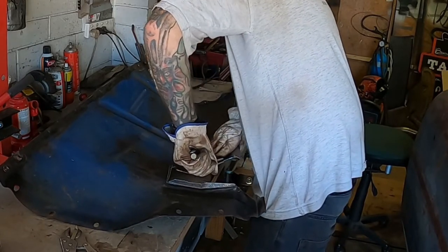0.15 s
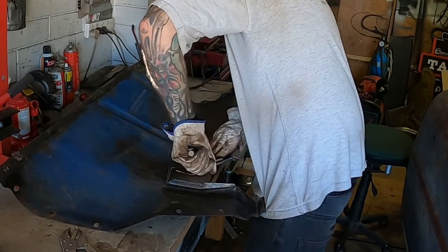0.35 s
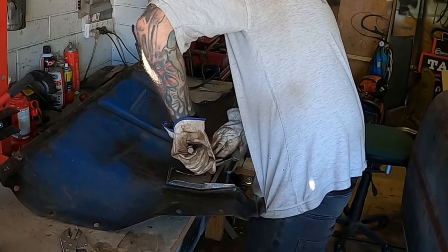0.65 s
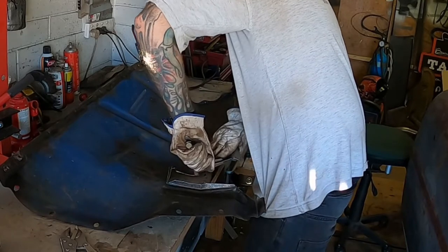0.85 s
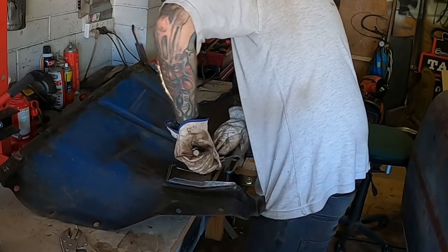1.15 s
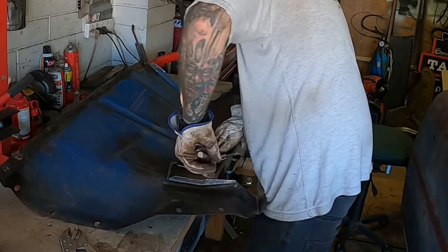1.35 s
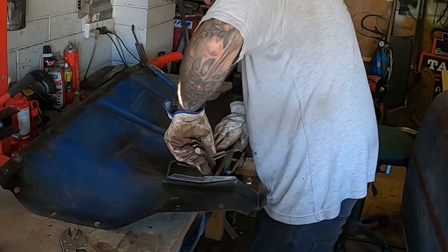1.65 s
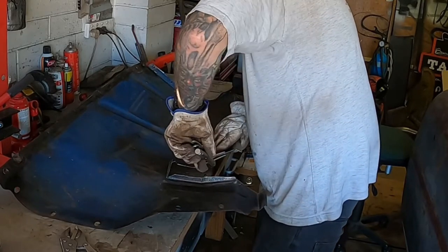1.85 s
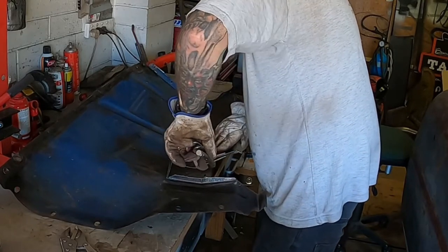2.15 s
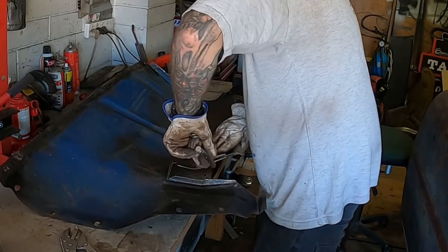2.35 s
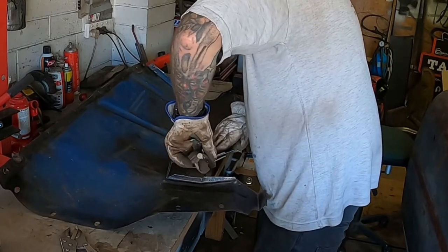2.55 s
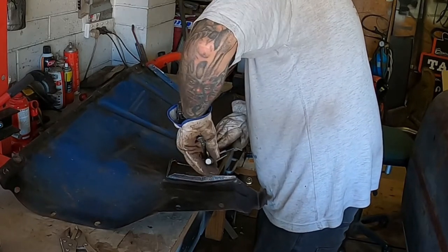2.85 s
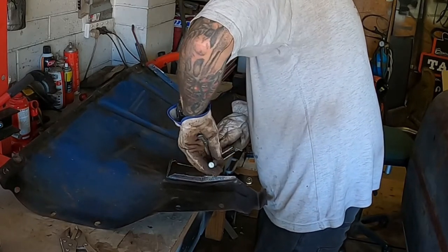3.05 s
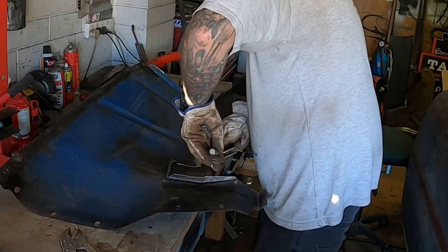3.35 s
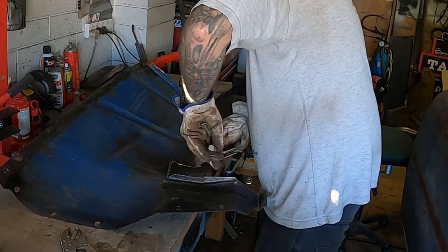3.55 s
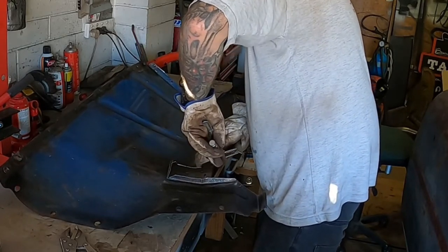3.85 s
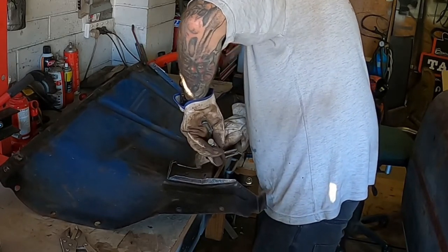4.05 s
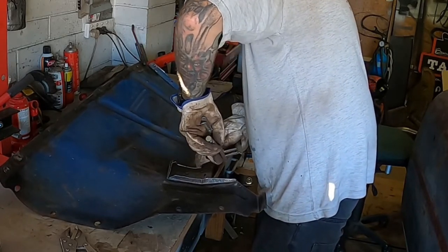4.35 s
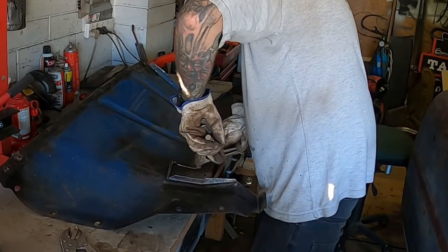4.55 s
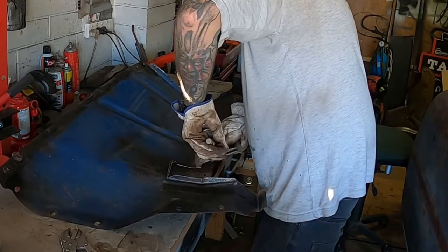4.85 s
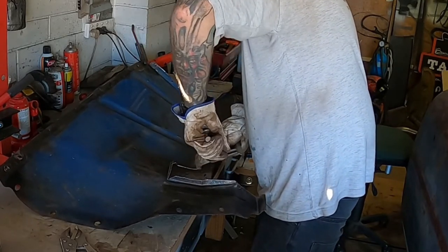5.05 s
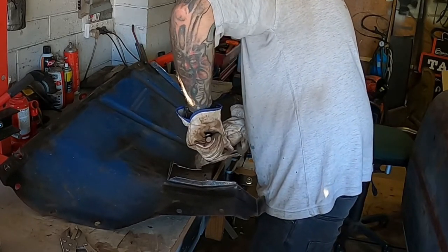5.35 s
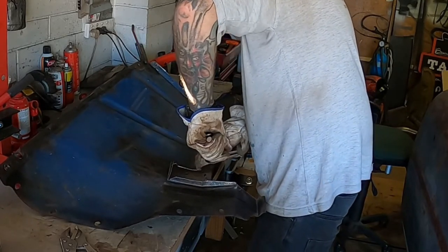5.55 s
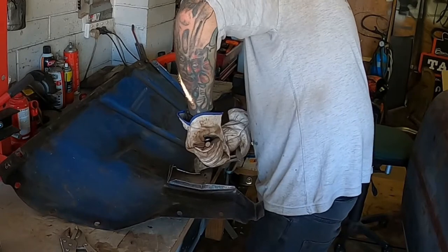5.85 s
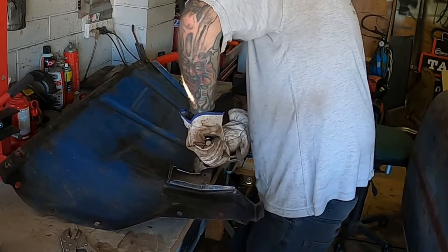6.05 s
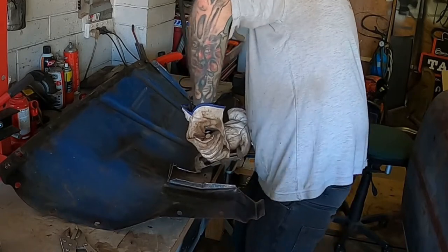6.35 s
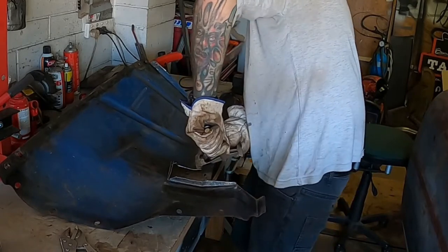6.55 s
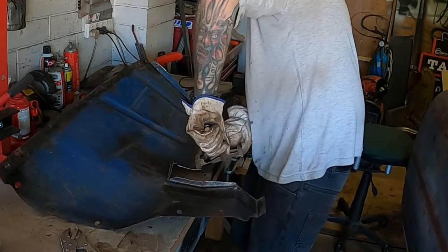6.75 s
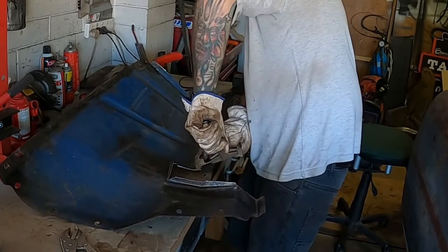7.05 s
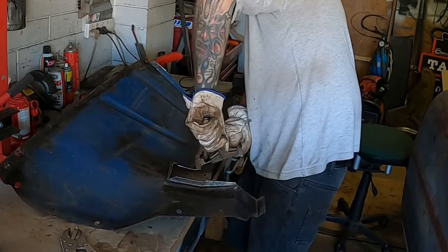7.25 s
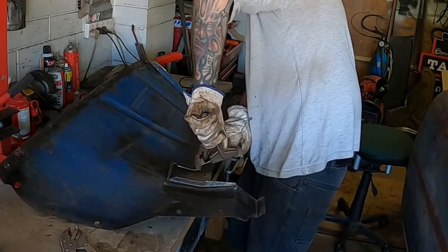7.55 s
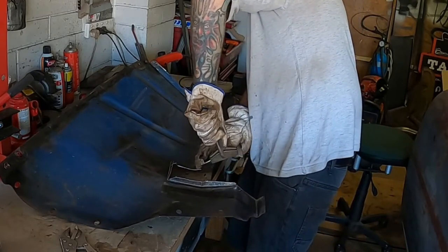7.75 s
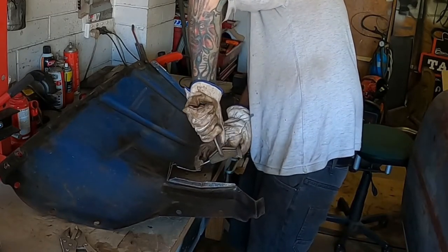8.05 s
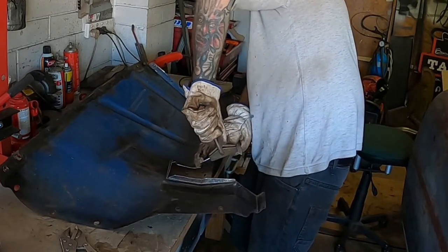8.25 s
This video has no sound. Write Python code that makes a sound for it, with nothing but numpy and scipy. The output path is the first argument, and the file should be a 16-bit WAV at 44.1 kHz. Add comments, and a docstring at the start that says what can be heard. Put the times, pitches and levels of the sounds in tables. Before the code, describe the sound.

A low, wavering machine hum and soft garage murmur run throughout, with a light scrape at the start. From 0.3 s a tool clicks and knocks on sheet metal, tapping unevenly, then building to denser clanks at 1.3-1.65 s. At about 2.1 s comes the loudest ringing clank, with a short rising metallic creak. Knocks, rattles and gritty slides crowd 2.4-3.45 s, turning more hollow. It then thins to faint dull taps until a bright, springy jaw snap at 4.5 s. Sparse knocks lead to a sharp, loud clank at 5.84 s, more clanks to 6.4 s, and softer thuds fading by 7 s. Sparrows chirp faintly outside, around 1, 1.9, 3.5, 5.6, 6.2 and 7.8 s. A tiny thin tone sounds twice near 8 s, before small final taps. Close stereo perspective, with an echoing room.

```python
"""A low, wavering hum and a soft murmur come first, with a light scrape; then a tool knocks sheet metal.
A gloved hand works the tool's jaws on the edge of a panel lying on a garage bench: each blow taps a set of
ringing panel modes, slides and bends feed them noisy slips, and one jaw snap is decaying bands of noise.
Sparrows chirp outside as gliding near-sine notes with echoes, and a faint thin tone sounds twice.
A small two-port microphone hears it all, each port with its own colour and phase."""
import sys
import numpy as np
from scipy import signal
from scipy.fft import rfft, irfft, next_fast_len
from scipy.io import wavfile
from scipy.ndimage import uniform_filter1d

SR = 44100
rng = np.random.default_rng(int(sys.argv[2]) if len(sys.argv) > 2 else 0)


def unload_wav(signal):
    """Save mono or channel-first audio to the path in sys.argv[1] as 16-bit WAV at rate SR, clipped to [-1, 1]."""
    wavfile.write(
        sys.argv[1],
        SR,
        np.round(np.clip(np.atleast_2d(signal).T, -1, 1) * 32767).astype(np.int16),
    )


N = 370432  # length in samples

# Background murmur, its relative strength by pitch: pitch_hz, level_db
AIR_COLOUR = [(36, -17), (62, -1.5), (76, -8), (198, -18), (330, -22), (389, -23.5), (417, -26.5),
              (514, -31), (799, -43.5), (1680, -35), (3370, -36.5), (3700, -36), (11300, -59.5),
              (16000, -118)]
AIR_DB = -43  # overall level

# Low machine tone, its level before the waver: time_s, level_db
HUM_LEVEL = [(0.0, -39), (0.06, -38), (0.28, -31), (0.68, -41.5), (0.72, -42), (0.91, -31), (2.08, -35.5),
             (2.13, -38.5), (2.29, -35), (2.66, -35), (2.76, -40), (4.49, -33), (4.82, -36), (4.89, -53),
             (4.96, -38), (5.19, -38), (5.26, -34), (6.57, -34), (6.76, -40.5), (7.44, -32), (8.35, -39),
             (8.4, -47)]
HUM_HZ, HUM_WAVER_DB = 48.2, 1
# Wavering noise bands around the hum: pitch_hz, width_hz, level_db
DRONE_BANDS = [(28.3, 25, -50), (104.5, 43, -50), (126, 13, -76)]
# A noise band that comes and goes: time_s, level_db
MOAN_LEVEL = [(0.0, -60), (1.61, -49), (1.85, -69), (2.41, -52), (5.38, -52), (5.78, -50.5), (7.13, -51.5),
              (7.51, -47), (8.4, -54)]
MOAN_HZ, MOAN_WIDTH_HZ = 187, 18

# Sparrow notes that arch up and drop; level is at the start of the dry note:
# start_s, length_s, top_hz, before_drop_hz, end_hz, level_db
ARCHED_NOTES = [(1.035, 0.06, 5150, 5050, 3200, -47), (1.852, 0.078, 4850, 4200, 3220, -44),
                (3.475, 0.08, 5050, 4700, 4200, -46), (5.625, 0.075, 5200, 4900, 4000, -50),
                (6.18, 0.065, 4900, 4950, 4700, -51), (7.78, 0.065, 4750, 4700, 3500, -56)]
ARCH_START = .64  # starting pitch as a share of the top
ARCH_UP, ARCH_DOWN = .17, .75  # shares of the length where the top begins and ends
ARCH_SWELL_DB = 8  # gain reached by the end of the note
# The other half of the syrinx sings along a little lower
SECOND_VOICE, SECOND_VOICE_DB = .9, -7  # share of the pitch, relative level
# Near-sine bird notes and faint, nearly steady partials that glide one way;
# level is at the start of the dry note: start_s, length_s, start_hz, end_hz, level_db
GLIDING_TONES = [(1.105, .03, 4600, 3000, -52), (1.935, 0.1, 3200, 4350, -42), (3.54, .06, 5500, 5400, -56),
                 (3.563, 0.105, 3400, 4700, -44), (4.973, 0.021, 5200, 3000, -50),
                 (5.62, .05, 5850, 5600, -55), (5.7, .03, 4200, 2900, -51), (6.228, 0.072, 3550, 4200, -43),
                 (7.32, .06, 6600, 5400, -63), (7.38, 0.024, 5300, 2900, -50),
                 (7.476, 0.03, 3150, 3750, -56), (7.775, .05, 6250, 6100, -64),
                 (7.79, .05, 3150, 3100, -57)]
GLIDE_SWELL_DB = 0.5  # gain reached by the end of the note
FLUTTER = .018  # spread of the pitch flutter, as a share of the pitch
# A faint thin tone, twice: start_s, length_s
THIN_TONES = [(7.945, .065), (8.035, .05)]
THIN_TONE_HZ, THIN_TONE_DB = 1570, -59
BIRD_DIRECT_DB, BIRD_ROOM_DB = -4, -9
YARD_DB, YARD_T60_S = -4, .18  # walls outside; t60 is the time to fall by 60 dB

# Garage echo, time to fall by 60 dB: pitch_hz, fall_s
ROOM_FALL = [(200, 0.82), (1500, 0.46), (5000, 0.85), (12000, 0.22)]
ROOM_DB, ROOM_RISE_S = -17.5, 0.026
ROOM_LIKENESS, ROOM_ALIKE_HZ = 0.29, 700  # power share common to both ports; own parts thin out below this
NEAR_DB, NEAR_FROM_HZ, NEAR_MOVES_HZ = -3.5, 1500, 6  # close echoes: level, treble from, rate of change
NEAR_FADE_S = 0.016  # time to fall to about a third

# The panel's strong modes; each one's own ring time is averaged, as a loss, with that of the tap:
# pitch_hz, level_db, own_ring_s
PANEL_MODES = [(175, -6, .5), (340, -6, .4), (478, -8, .4), (693, -10, .5), (786, -8, .2), (890, -8, .5),
               (948, 0, .45), (1090, -1, .5), (1234, -8, .4), (1328, -7, .45), (1596, -6, .35),
               (1752, -5, .5), (1852, -6, .5), (2063, -5, .6), (2205, -6, .55), (2350, -6, .45),
               (2530, -7, .35), (2770, -6, .3), (3180, -7, .4), (3339, -8, .4), (3561, -7, .5),
               (3740, -10, .4), (4300, -10, .3), (4780, -10, .35), (5044, -10, .3), (5900, -12, .25),
               (6675, -16, .3)]
# The sheet's countless small modes: pitch_hz, share_of_ring_time
SHEET_RING_SHARE = [(200, 1.55), (700, 0.59), (2000, 0.87), (5000, 0.22), (12000, 0.063)]
MODE_SCATTER_DB, MODE_DETUNE = 2, 0.0023  # random spread of each mode's level and, as a share, its pitch
FAVOUR_DB, FAVOUR_OCTAVES, FREE_RING = 7.5, 0.19, 0.11  # boost, low part's width, extra ring-time share
RING_LEN, LEAD = 16384, 256  # samples; the lead leaves room for the filters to swing in

# The jaws spring shut in free air: start_s, level_db
JAW_SNAP_TIMES = [(4.5144, -22.5)]
# The tool's steel jaws: pitch_hz, relative_level_db, fall_by_60_db_s
JAW_RING_MODES = [(3170, -4.5, 0.36), (4660, 1, 0.14), (6670, -11.5, 0.097), (9020, -8, 0.12),
                  (12100, -22, .04)]
JAW_SPREAD, JAW_RISE_S = 0.063, 0.0023  # cluster half-width as a share of pitch; time to build up

# The panel creaks as it bends, and its ring moves in pitch: start_s, length_s, level_db, from_hz, to_hz
PANEL_BENDS = [(2.148, 0.14, -28, 934, 1090), (6.82, 0.27, -52.5, 930, 880)]
BEND_OCTAVES, BEND_T60_S, BEND_MODES_DB, BEND_FADE_DB = 0.19, 0.079, -5, -9

# Slides of jaw and glove; level is the dull part, brightness is relative to it:
# start_s, held_s, level_db, brightness_db
SLIDE_EVENTS = [(0.0, 0.16, -53, -2), (0.7, 0.071, -44, -5), (1.2, 0.27, -45, -1), (1.6, 0.13, -40.5, -23),
                (1.819, 0.17, -62.5, -24), (2.2, 0.05, -53, -1), (2.48, 0.25, -39, -3),
                (2.86, 0.019, -43, 1), (3.18, 0.073, -33.5, -4), (3.55, 0.39, -61, -7),
                (4.7, 0.37, -61.5, -3), (5.12, 0.2, -62, 6.5), (5.449, 0.39, -65, -9),
                (5.9, 0.071, -35, -8.5), (6.15, 0.27, -67, 17), (6.6, 0.18, -61, -4), (6.82, 0.11, -51, -9),
                (8.28, .2, -65, 3.5)]
SLIDE_RISE_DB_S, SLIDE_FALL_DB_S = 232.5, 141
RUSTLE_DB, RUSTLE_BRIGHT_DB = -67, -0.5  # steady scrape under the slides; its brightness

# Blows. The clank (1.5-4 kHz) is a peak level; thud (under 500 Hz), body (0.5-1.5 kHz), click (4-8 kHz)
# and tick (over 8 kHz) are short-term rms levels relative to it. First contact is relative to the rattle:
# start_s, clank_db, thud_db, body_db, click_db, tick_db, thud_hz, low_favoured_hz, high_favoured_hz,
# rattle_s, first_contact_size
BLOW_EVENTS = [(0.308, -29, -19, -20, -2.5, -12.5, 116, 1680, 4630, 0.048, 1.5),
               (0.5014, -47.5, -7, -13, -12, -12, 135, 1050, 2390, 0.023, 1.2),
               (0.6357, -41.5, -11, -11.5, -12, -14, 116, 573, 3190, 0.088, 0.3),
               (0.6678, -26, -20, -23, -23, -13, 116, 1060, 5040, 0.048, 1.37),
               (0.8102, -50, 5, 4.5, -4.5, -27, 117, 540, 1880, 0.022, 0.89),
               (0.951, -39, -14, -10, -19, -25, 116, 1260, 5750, 0.057, 0.81),
               (1.13, -35, 9.5, -20, -21, -18.5, 111.4, 585, 3750, 0.018, 0.74),
               (1.1947, -26.5, -6.5, -40, -35, -42, 159, 1440, 2000, 0.036, 2.4),
               (1.3109, -31.5, -5.5, -34, -13, -19, 290, 1070, 2150, 0.058, 0.22),
               (1.3691, -23, -22, -15, -9.5, -13, 159, 790, 2200, 0.028, 0.61),
               (1.5165, -18, -37, -36, -20.5, -28, 120, 1190, 3680, 0.0097, 0.53),
               (1.521, -17, -24, -13.5, -35, -32, 119, 1250, 1590, 0.059, 0.65),
               (1.581, -13, -25, -14.5, -18, -18.5, 519, 980, 2390, 0.023, 0.74),
               (1.618, -21.5, -27, -11, -25, -29, 515, 1010, 2450, 0.015, 1.2),
               (1.6398, -25, -7.5, -4.5, -9.5, -14.5, 164, 970, 2380, 0.026, 0.46),
               (2.107, -24, -14, -12, -23, -29, 151, 730, 3800, 0.034, 0.045),
               (2.1388, -5.5, -32, -18.5, -20, -25.5, 258, 940, 3400, 0.011, 0.37),
               (2.176, -17.5, -16, -1.5, -31, -31, 258, 970, 3500, 0.025, 0.84),
               (2.204, -33, -25, -10, -28, -34, 258, 1040, 1790, 0.018, 0.72),
               (2.243, -33, -27, -8, -37, -44, 258, 1020, 1850, 0.02, 0.6),
               (2.272, -36, -24, -4, -33, -35, 258, 1080, 1800, 0.0074, 1.2),
               (2.4503, -20, -17.5, -24, -16, -29, 170, 1110, 5100, 0.0077, 0.97),
               (2.5084, -14.5, -17.5, -13, -27, -43, 251, 656, 2430, 0.014, 1.8),
               (2.53, -19, -8.5, -14, -39, -38, 243, 670, 2300, 0.013, 0.55),
               (2.562, -25, -4.5, -28, -6, -14.5, 168, 665, 3760, 0.0097, 0.54),
               (2.6503, -33.5, -7, -14, -16, -10, 116, 690, 2260, 0.036, 1.7),
               (2.6825, -15.5, -26, -59, -17.5, -21, 130, 1110, 3250, 0.0079, 1.8),
               (2.825, -17.5, -37, -14.5, -11.5, -13.5, 520, 1010, 2480, 0.027, 0.72),
               (3.0393, -28, -11, -7.5, -19, -26, 323, 547, 4920, 0.07, 0.37),
               (3.0674, -26.5, -14, -6.5, -18.5, -37, 285, 1430, 2600, 0.1, 0.37),
               (3.1222, -17, -19, -12, -9.5, -37, 474, 980, 2540, 0.03, 1.6),
               (3.1356, -13, -12, -5, -20.5, -35, 373, 1060, 1900, 0.034, 1.04),
               (3.2594, -23.5, -7, -2, -40, -39, 410, 1010, 1580, 0.071, 0.96),
               (3.3371, -27, -11.5, -5, -24, -27, 326, 950, 1500, 0.088, 0.76),
               (3.391, -30.5, -4, -3, -40, -41, 192, 1190, 1530, 0.047, 0.25),
               (3.425, -31.5, -16, 0, -26, -39, 176, 1030, 1530, 0.034, 0.86),
               (3.8409, -43.5, 6.5, -0.5, -32, -30, 176, 1200, 1730, 0.037, 0.19),
               (3.8647, -40, -14, -16, -13, -18, 137, 1060, 2880, 0.043, 0.46),
               (4.26, -57.5, -3, 4.5, -7, -20, 135, 1160, 1570, 0.029, 0.74),
               (4.4739, -45.5, 3, 9.5, -17, -28, 178, 1200, 1730, 0.15, 0.29),
               (4.5155, -22, -5.5, -11, -29, -30, 473, 890, 4400, 0.028, 0.26),
               (4.9267, -45.5, -5, -4, -11, -27, 144, 1180, 1810, 0.033, 0.04),
               (5.2954, -32, -11.5, -11.5, -54, -57, 170, 1280, 2140, 0.043, 0.72),
               (5.4785, -55.5, -3, 0.5, -2, -13, 137, 552, 2350, 0.016, 1),
               (5.7328, -18, -5.5, -9.5, -27, -28.5, 296, 660, 1960, 0.053, 0.65),
               (5.839, -8.5, -28, -30.5, -16, -26.5, 430, 940, 2760, 0.028, 1),
               (6.1166, -22, -37, -14, -25, -30, 406, 1100, 2100, 0.052, 0.48),
               (6.3285, -31.5, -2.5, 0, -44, -44, 300, 1090, 1580, 0.022, 0.73),
               (6.3511, -20.5, -24, -14.5, -44, -37, 304, 1120, 2980, 0.019, 0.12),
               (6.3783, -16, 0, -20.5, -55, -51, 294, 830, 1790, 0.013, 2.7),
               (6.526, -38.5, -20, -24, -20, -24, 262, 1380, 2140, 0.033, 0.78),
               (6.5782, -56, -5, -21, -16, -5, 141.8, 1050, 1560, 0.02, 0.92),
               (6.6431, -52, 0, 4.5, -7, -28, 207, 1210, 1560, 0.014, 0.96),
               (6.6965, -43.5, -5, -1, -9.5, -42, 186, 1098, 2060, 0.022, 1.4),
               (6.7413, -43, -2, 1.5, -11, -40, 192.2, 1200, 1770, 0.0093, 1.4),
               (6.778, -29, 0, -0.5, -35, -33, 525, 890, 1560, 0.0046, 1.9),
               (6.802, -39, 2, -2, -16, -27, 342, 1140, 1540, 0.092, 0.69),
               (6.9796, -55.5, -2, 4.5, -13, -14, 116, 847, 1550, 0.034, 0.84),
               (8.2835, -43.5, -2, -20, -10, -32, 184, 1050, 2830, 0.038, 0.57),
               (8.344, -50, -5, -9, -2, -13, 121, 1070, 2620, 0.075, 0.22)]
# Borders between thud, body, clank, click and tick: pitch_hz
BLOW_BORDERS = [500, 1500, 4000, 8000]
RATTLE_SCATTER_DB, TICK_FALL_HZ = 4, 10600  # unevenness of the rattle; treble falls away from here
SOFT_RISE_S = 0.0062  # slowest build-up of the rattle; a harder first contact shortens it
THUD_FALL_S, THUD_REST, THUD_OCTAVES = 0.039, 0.43, 0.74  # early fall time, part left over, width
STRONG_MODES_DB, RING_T60_S = -12, 0.41  # strong modes against small ones; the blow's ring time

# Left port's level minus the right's: pitch_hz, difference_db
PORT_LEVEL = [(200, 0), (700, .3), (1400, 1.5), (2800, 2.2), (5000, 1), (7000, -1.5), (9500, -4),
              (14000, -4.5)]
# How far the left port leads the right: pitch_hz, lead_radians
PORT_LEAD = [(200, -.05), (1000, -.3), (3200, -.75), (5000, -.6), (6500, -.6), (8500, -.3)]
TOP_HZ = 15300  # microphone's upper limit


def undb(db):
    """Turn decibels into gain."""
    return 10 ** (np.asarray(db) / 20)


def unit(x):
    """Scale to an rms of 1."""
    return x / np.sqrt(np.mean(x ** 2) + 1e-30)


def over_hz(table, hz):
    """Read a (pitch, value) table on a log-frequency axis."""
    f, v = np.transpose(table)
    return np.interp(np.log(np.maximum(hz, 1)), np.log(np.maximum(f, 1)), v)


def over_time(table):
    """Read a (time, value) table at every sample."""
    s, value = np.transpose(table)
    return np.interp(np.arange(N) / SR, s, value)


def shape(x, gain):
    """Filter a sound by a gain that is a function of frequency."""
    n = next_fast_len(x.shape[-1])
    hz = np.arange(n // 2 + 1) * SR / n
    return irfft(rfft(x, n) * gain(hz), n)[..., :x.shape[-1]]


def bump(hz, centre_hz, octaves):
    """Give a bell-shaped band on a log-frequency axis."""
    return np.exp(-.5 * (np.log2(np.maximum(hz, 1) / centre_hz) / octaves) ** 2)


def resonance(hz, centre_hz, width_hz):
    """Give a narrow band that falls to half its height at the edges of its width."""
    return 1 / (1 + (2 * (hz - centre_hz) / width_hz) ** 2)


def walk(rate):
    """Drift randomly: hold new levels for 1 / rate seconds, smooth twice, scale to rms 1."""
    k = int(SR / rate)
    steps = np.repeat(rng.standard_normal(N // k + 1), k)
    smooth = uniform_filter1d(uniform_filter1d(steps, k), k)
    return unit(smooth[:N])


def tail(t, t60_of_hz):
    """Make noise whose octave bands each die away at their own rate."""
    hz = 125 * 2. ** np.arange(8)[:, None]
    bands = shape(rng.standard_normal(len(t)), lambda f: bump(f, hz, 1.0))
    fall = 1000. ** (-t / np.maximum(t60_of_hz(hz), .01))
    return (bands * fall).sum(axis=0)


def air():
    """Garage and street murmur: octave bands swell together and flicker alone; bass is most alike at the ports."""
    swell = walk(0.65)
    mid = rng.standard_normal(N)
    side = shape(rng.standard_normal(N), lambda f: np.clip(0.34 + f / 6000, 0, .8))
    pair = mid + side * np.array([[1], [-1]])
    pair = shape(pair, lambda f: undb(over_hz(AIR_COLOUR, f)))
    out = 0
    for hz in 62.5 * 2. ** np.arange(9):
        band = shape(pair, lambda f: bump(f, hz, 1.0))
        out = out + undb(swell + 3.2 * walk(6.6)) * band
    return undb(AIR_DB) * unit(out)


def hum():
    """A low machine sine wavers in pitch and level, with looser noise bands around and above it."""
    phase = 2 * np.pi * np.cumsum(HUM_HZ + 0.673 * walk(13)) / SR
    level_db = over_time(HUM_LEVEL) + HUM_WAVER_DB * walk(8)
    out = np.sqrt(2) * undb(level_db) * np.sin(phase)
    for centre_hz, width_hz, band_db in DRONE_BANDS:
        band = shape(rng.standard_normal(N), lambda f: resonance(f, centre_hz, width_hz))
        out = out + undb(band_db + 2.4 * walk(1.31)) * unit(band)
    moan = shape(rng.standard_normal(N), lambda f: resonance(f, MOAN_HZ, MOAN_WIDTH_HZ))
    return out + undb(over_time(MOAN_LEVEL)) * unit(moan)


def whistles():
    """Near-sine tones with soft ends: row 0, birds and faint partials, flutters; row 1, the thin tone, hardly."""
    notes = []
    for s, length, top, sag, end, db in ARCHED_NOTES:
        shares, hz = [0, ARCH_UP, ARCH_DOWN, 1], np.array([ARCH_START * top, top, sag, end])
        notes.append((s, length, shares, hz, db, ARCH_SWELL_DB, 1, 0))
        notes.append((s, length, shares, SECOND_VOICE * hz, db + SECOND_VOICE_DB, ARCH_SWELL_DB, 1, 0))
    for s, length, start, end, db in GLIDING_TONES:
        notes.append((s, length, [0, 1], [start, end], db, GLIDE_SWELL_DB, 1, 0))
    for s, length in THIN_TONES:
        notes.append((s, length, [0, 1], [THIN_TONE_HZ, THIN_TONE_HZ], THIN_TONE_DB, 0, .15, 1))
    out = np.zeros((2, N))
    for s, length, shares, hz, db, swell_db, rough, row in notes:
        a, n = int(s * SR), int(length * SR)
        u = np.arange(n) / n
        # two separate wobbles, one for pitch and one for level
        bend, throb = (rough * unit(uniform_filter1d(rng.standard_normal(8192), size=45))[:n]
                       for _ in range(2))
        pitch_hz = np.interp(u, shares, hz) * (1 + FLUTTER * bend)
        tone = np.sin(2 * np.pi * np.cumsum(pitch_hz) / SR)
        level = np.sqrt(2) * undb(db + swell_db * u + 3.5 * throb)
        out[row, a:a + n] += level * signal.windows.tukey(n, .2) * tone
    return out


def yard(x):
    """Walls outside smear each note with short dense echoes, different at each port."""
    t = np.arange(8192) / SR
    echo = rng.standard_normal((2, len(t))) * 1000. ** (-t / YARD_T60_S)
    return np.array([undb(YARD_DB) * signal.oaconvolve(x, unit(e) / np.sqrt(len(t)))[:N] for e in echo])


def room(x, db):
    """Garage echo: a dying noise tail, partly the same at both ports, the bass most of all."""
    t = np.arange(32768) / SR
    same, left, right = (tail(t, lambda f: over_hz(ROOM_FALL, f)) * np.minimum(t / ROOM_RISE_S, 1)
                         for _ in range(3))
    out = []
    for own in (left, right):
        own = shape(own, lambda f: f / (f + ROOM_ALIKE_HZ))
        echo = np.sqrt(ROOM_LIKENESS) * same + np.sqrt(1 - ROOM_LIKENESS) * own
        echo = echo / np.sqrt(np.sum(echo ** 2))
        out.append(undb(db) * signal.fftconvolve(x, echo)[:N])
    return np.array(out)


def near(x):
    """Bench, arms and body scatter treble in brief echoes, unlike at each port and changing as the body moves."""
    t = np.arange(2048) / SR
    echo = rng.standard_normal((6, len(t))) * np.exp(-t / NEAR_FADE_S)
    echo = shape(echo, lambda f: f / (f + NEAR_FROM_HZ))
    heard = np.array([signal.oaconvolve(x, unit(e) / np.sqrt(len(t)))[:N] for e in echo])
    # three drifting weights of constant total power blend three echoes per port
    pose = np.array([walk(NEAR_MOVES_HZ) for _ in range(3)])
    pose = pose / np.sqrt(np.sum(pose ** 2, axis=0))
    left, right = np.sum(pose * heard[:3], axis=0), np.sum(pose * heard[3:], axis=0)
    return undb(NEAR_DB) * np.array([left, right])


def ring(t60, low_hz, high_hz, modes_db):
    """The panel answers one tap: its strong modes, struck unevenly, over the dense small ones."""
    t = np.arange(RING_LEN, dtype=np.float32) / SR
    hz, db, own_s = np.transpose(PANEL_MODES)[:, :, None]
    chance = rng.standard_normal((len(PANEL_MODES), 2))

    def favoured(f):
        """The contact place makes one low and one high part louder and leaves them freer to ring."""
        return bump(f, low_hz, FAVOUR_OCTAVES) + 0.72 * bump(f, high_hz, 0.2)

    size = undb(db + MODE_SCATTER_DB * chance[:, :1])
    # average the loss of each mode's own ring time with that of the tap's ring time
    loss = np.log(1000) * (.5 / own_s + .5 / t60 / (1 + FREE_RING * favoured(hz)))
    turn = 2 * np.pi * hz * (1 + MODE_DETUNE * chance[:, 1:])
    tones = size[:, 0] @ (np.exp(-np.float32(loss) * t) * np.sin(np.float32(turn) * t))
    small = tail(t, lambda f: t60 * over_hz(SHEET_RING_SHARE, f))
    sound = unit(small) + undb(modes_db) * unit(tones)
    fade = np.minimum((t[-1] - t) / .1, 1)
    return shape(sound, lambda f: undb(FAVOUR_DB * favoured(f))) * fade


def jaws():
    """The tool's own bright ring: each mode is a noise band, like a rough cluster of close tones."""
    out = np.zeros(N)
    for s, db in JAW_SNAP_TIMES:
        t = np.maximum(np.arange(N) / SR - s, 0)
        rise = 1 - np.exp(-t / JAW_RISE_S)
        for hz, mode_db, t60 in JAW_RING_MODES:
            cluster = shape(rng.standard_normal(N), lambda f: 1 / (1 + ((f / hz - 1) / JAW_SPREAD) ** 4))
            out += undb(db + mode_db) * rise * 1000. ** (-t / t60) * unit(cluster)
    return out


def bends():
    """Quick slips at the fold make a narrow group of modes sing; it shifts as the sheet stiffens or relaxes."""
    out = np.zeros(N)
    for s, length, db, from_hz, to_hz in PANEL_BENDS:
        a, n = int(s * SR), int(length * SR)
        u = np.arange(n) / n
        slips = rng.standard_normal(n) * (rng.random(n) < .01) * undb(BEND_FADE_DB * u)
        sung = 0
        # cross-fade the slips from the first group of modes to the second
        for share, hz in ((1 - u, from_hz), (u, to_hz)):
            group = shape(ring(BEND_T60_S, hz, hz, BEND_MODES_DB), lambda f: bump(f, hz, BEND_OCTAVES))
            sung = sung + signal.fftconvolve(slips * share, group)
        out[a:a + len(sung)] += undb(db) * sung / np.sqrt(np.mean(sung[:n] ** 2))
    return out


def scrape():
    """Dense uneven slips of jaw and glove set the panel buzzing briefly; each slide rises, holds and fades."""
    t = np.arange(N) / SR
    s, held, db, bright_db = np.transpose(SLIDE_EVENTS)[:, :, None]
    rise_db = SLIDE_RISE_DB_S * np.maximum(s - t, 0)
    fall_db = SLIDE_FALL_DB_S * np.maximum(t - s - held, 0)
    slide = undb(db - rise_db - fall_db)
    slips = rng.standard_normal(N) * undb(3 * walk(40)) * (rng.random(N) < .12)
    buzz = signal.fftconvolve(slips, ring(0.074, 1357, 2580, -27))[:N]
    dull = unit(shape(buzz, lambda f: bump(f, 810, 1.0)))
    bright = unit(shape(buzz, lambda f: bump(f, 3850, 0.8)))
    dull_level = undb(RUSTLE_DB) + slide.sum(axis=0)
    bright_level = undb(RUSTLE_DB + RUSTLE_BRIGHT_DB) + undb(bright_db[:, 0]) @ slide
    return dull_level * dull + bright_level * bright


def rattle_taps(rattle_s, first):
    """A first contact, then sparse random taps that build up and die away."""
    t = np.arange(4096) / SR
    size = undb(RATTLE_SCATTER_DB * rng.exponential(size=len(t))) * rng.standard_normal(len(t))
    rise = 1 - np.exp(-t / (SOFT_RISE_S * np.clip(1 - first, .02, 1)))
    push = rise * np.exp(-(t / max(rattle_s, .001)) ** 2)
    taps = push * size * (rng.random(len(t)) < .025)
    taps /= np.sqrt(np.sum(taps ** 2))
    taps[0] = first
    return taps


def blows():
    """Each blow is a first contact and short rattle into the panel; where and how it lands sets its colour."""
    out = np.zeros(N + RING_LEN)
    edges = np.array(list(BLOW_BORDERS) + [SR])[:, None]
    i = np.arange(RING_LEN)
    fade = np.interp(i, [0, LEAD / 2, RING_LEN - 4096, RING_LEN], [0, 1, 1, 0])

    def split(f):
        """Five neighbouring bands, with the top treble falling away."""
        low_passes = 1 / (1 + (f / edges) ** 4)
        return np.diff(low_passes, axis=0, prepend=0) / (1 + (f / TICK_FALL_HZ) ** 6)

    for s, db, thud_db, body_db, click_db, tick_db, thud_hz, low_hz, high_hz, rattle_s, first in BLOW_EVENTS:
        taps = np.r_[np.zeros(LEAD), rattle_taps(rattle_s, first)]
        panel = ring(RING_T60_S, low_hz, high_hz, STRONG_MODES_DB)
        parts = shape(signal.fftconvolve(panel, taps)[:RING_LEN], split)
        parts[0] = shape(parts[0], lambda f: bump(f, thud_hz, THUD_OCTAVES))
        # the bench soon swallows most of the thud
        parts[0] *= THUD_REST + np.exp(-i / SR / THUD_FALL_S)
        # loudest short-term rms of each part, but the true peak for the clank
        peaks = np.sqrt(uniform_filter1d(parts[:, :8192] ** 2, size=512, axis=1).max(axis=1))
        peaks[2] = np.abs(parts[2]).max()
        parts *= fade
        gains = undb(db + np.array([thud_db, body_db, 0, click_db, tick_db])) / peaks
        at = int(s * SR) - LEAD
        out[at:at + RING_LEN] += gains @ parts
    return out[:N]


def scene():
    """Bench work close by, birds far off and full of echo, hum and air all round."""
    birds, thin_tone = whistles()
    outside = undb(BIRD_DIRECT_DB) * birds + yard(birds) + room(birds, BIRD_ROOM_DB) + thin_tone
    work = jaws() + bends() + scrape() + blows()
    return air() + hum() + outside + work + near(work) + room(work, ROOM_DB)


def record(dry):
    """The two ports differ in colour and phase, half the difference each way; the top is cut."""
    def half(f):
        return np.log(10) / 40 * over_hz(PORT_LEVEL, f) + .5j * over_hz(PORT_LEAD, f)

    ports = shape(dry, lambda f: np.exp(np.array([half(f), -half(f)])))
    return signal.sosfilt(signal.ellip(8, .2, 70, TOP_HZ, fs=SR, output="sos"), ports)


dry = scene()
out = record(dry)
unload_wav(out)
```